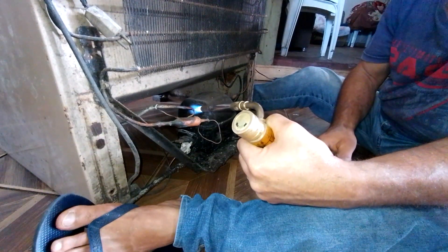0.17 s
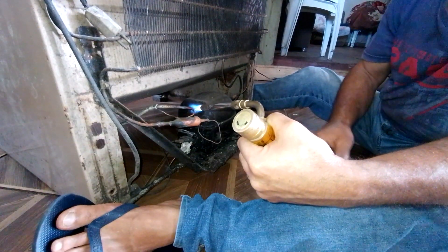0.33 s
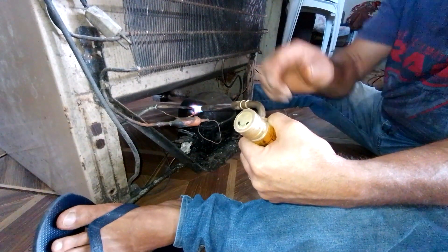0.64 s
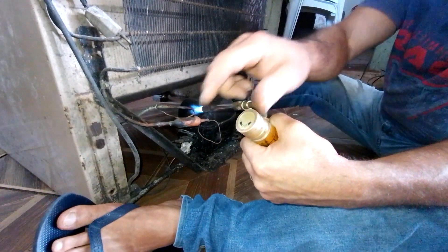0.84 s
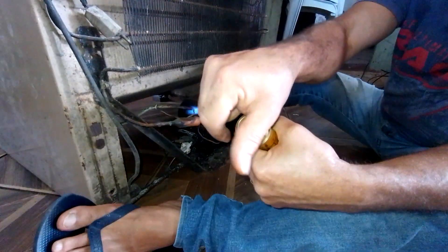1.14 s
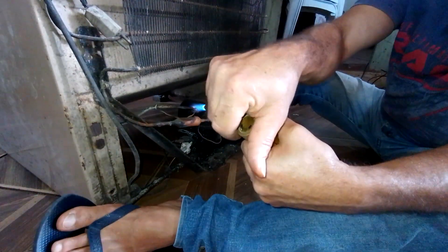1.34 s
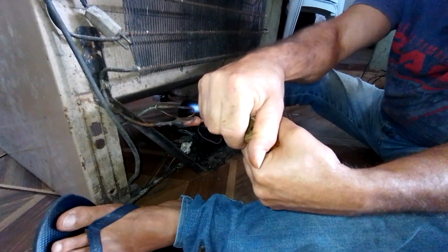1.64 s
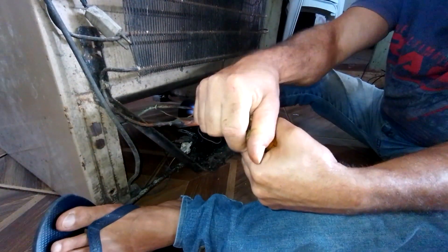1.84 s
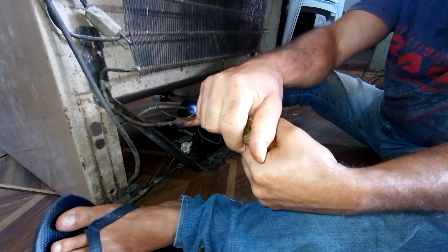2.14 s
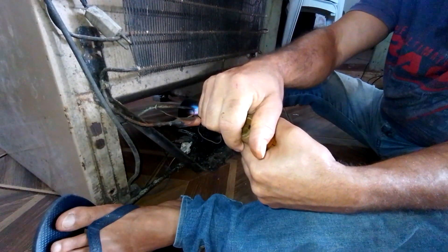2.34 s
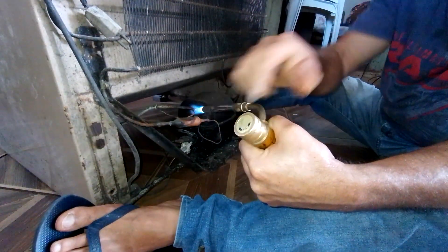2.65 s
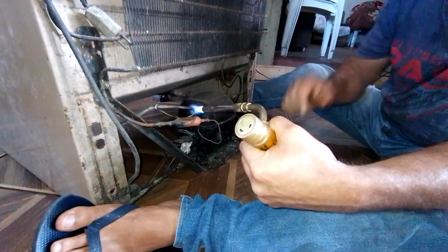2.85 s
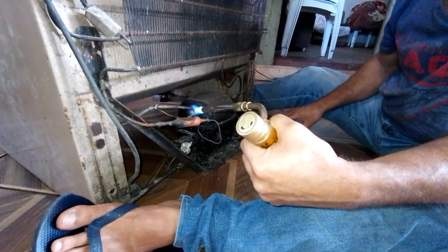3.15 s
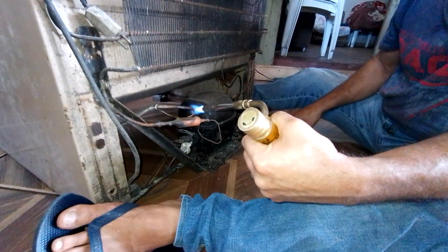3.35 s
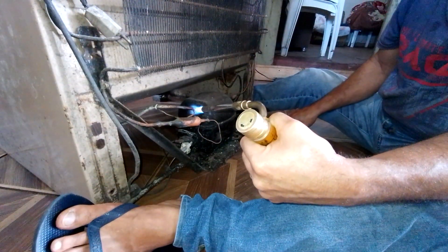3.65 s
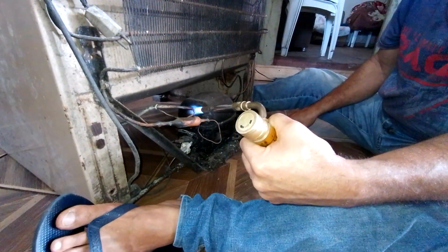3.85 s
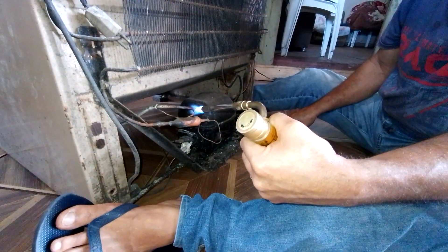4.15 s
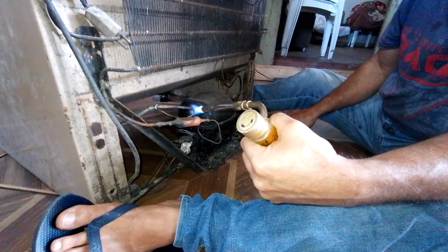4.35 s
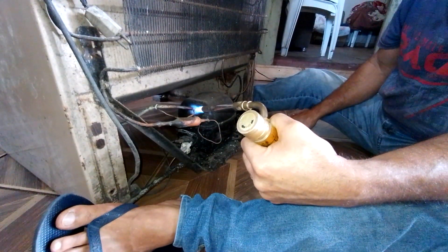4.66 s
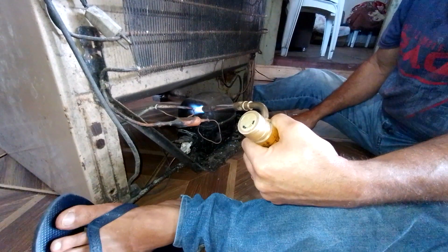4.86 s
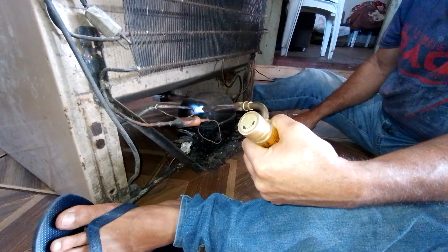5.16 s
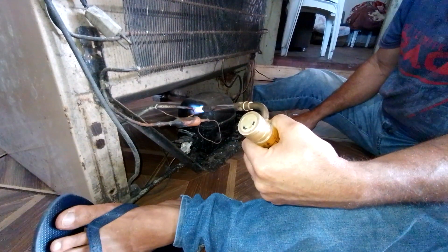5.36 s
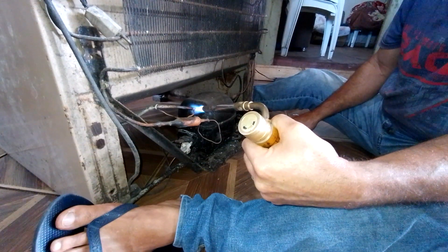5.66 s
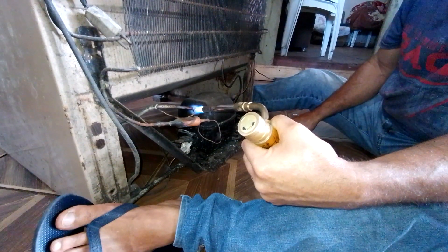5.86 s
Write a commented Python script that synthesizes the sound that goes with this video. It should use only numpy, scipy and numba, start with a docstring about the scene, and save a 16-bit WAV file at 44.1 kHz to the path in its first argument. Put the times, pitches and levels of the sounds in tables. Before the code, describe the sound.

Steady torch noise from start to end: hissing gas jet, rough airy roar, low drone and a thin unstable whistle inside a breathy tube note. Early on, a hand cups the torch and turns it up, bringing added piercing hiss for about a second before it settles into a fuller burn. Close single microphone, metallic colouring and short indoor echoes, with soft flame pops.

```python
"""The compressor bay of a refrigerator, where a hand-held gas torch heats a copper joint.
The gas jet hisses as filtered noise; the turbulent flame roars over a low drone and softly pops.
The burner tube sounds a wandering, breathy note (noise in a moving resonance) with a thin whistle (a tone).
A hand covers the torch for a while, and turning the valve up adds flow and extra hiss that settles.
The metal bay's resonances and short echoes colour it all, heard through one microphone."""
import sys
import numpy as np
from scipy import signal
from scipy.fft import rfft, irfft, next_fast_len
from scipy.io import wavfile
from scipy.ndimage import uniform_filter1d
from numba import njit

SR = 44100
rng = np.random.default_rng(int(sys.argv[2]) if len(sys.argv) > 2 else 0)


def waveform_to_disk(signal):
    """Save audio, clipped to [-1, 1], as 16-bit WAV at the path in sys.argv[1]."""
    frames = np.transpose(np.atleast_2d(signal))
    scaled = np.clip(frames, -1, 1) * 32767
    samples = np.round(scaled).astype(np.int16)
    wavfile.write(sys.argv[1], SR, samples)


N = 265041

# Noise spectra before the resonances, relative levels: (frequency [Hz], level [dB])
ROAR_SPECTRUM = [(40, -65), (200, -29.5), (400, -11), (540, -3), (660, 3), (950, 5.5), (1200, 2.5),
                 (1500, -2.5), (2000, -2.5), (3000, -8.5), (3900, -22), (4350, -46)]
DRONE_SPECTRUM = [(20, -32), (50, -40), (100, -22), (140, -18), (163, -20), (185, -16.5), (222, -13),
                  (270, -5.5), (305, -10), (370, -1.5), (430, -1.5), (560, -7), (1000, -35), (3000, -70)]
JET_SPECTRUM = [(20, -49), (800, -30), (2000, 0), (2600, 0), (3600, -0.5), (5500, 1.5), (7000, 1.5),
                (8300, 2.5), (9200, -2.5), (10560, -0.5), (10900, -19), (11500, -16.5), (11950, -33),
                (12700, -19.5), (13400, -26.5)]
VALVE_SPECTRUM = [(300, -55), (1000, -20), (2100, -15), (2650, 1), (3200, 1.5), (4400, 3), (5500, -11),
                  (8000, -15), (10800, -17), (11400, 2), (12400, -1), (13300, -30), (16000, -29)]

# Resonances and cancellations of the metal bay: (frequency [Hz], width [Hz], level [dB])
BAY_MODES = [(223, 15, 7.5), (250, 12, -12), (334, 6.7, 7.5), (362.3, 25.5, 11.5), (407.7, 8.5, 10.5),
             (437.4, 26, -21.2), (501.5, 40, 10.5), (546, 35, -11), (551, 223, -8), (584, 11, -7),
             (656, 75, 4.8), (742, 46, -3.5), (864, 22, 3.5), (915, 8, 4.5), (992, 9.2, 4.5),
             (1032, 12, 3.5), (1235, 19, -17.6), (1309, 71, -12), (1335, 9.2, 5.5), (1403, 196, 10),
             (1523, 5.8, 7.5), (1615, 25, -7), (1627, 15.3, 12.5), (1676, 7, 17.5), (1682, 158, -9.4),
             (1746, 8, 10.5), (1798, 28, 6.5), (1855, 8, 9), (2050, 59, -4.5), (2236, 27, -12),
             (2340, 110, 3), (2464, 24, 6), (2490, 23, -3), (2652, 16, 4), (2850, 125, -2),
             (3037, 6.9, 12.5), (3038, 270, -8), (3315, 140, 7.5), (3356, 36, -6.5), (3917, 354, -10),
             (3922, 19, 16), (4014, 18, 15), (4094, 9.4, 8.5), (4160, 7.3, 5), (4550, 53, -14),
             (4740, 16, -8.8), (4960, 293, -18.5), (5004, 100, 10.5), (5260, 140, -5.5), (5350, 95, 0.5),
             (6120, 150, -3.5), (6820, 350, -5), (7530, 210, 3.9), (7760, 75, -11), (9060, 560, -5.5),
             (9270, 225, -4.5), (9450, 284, 7.5)]
# The jet's hollow tone: (frequency [Hz], width [Hz], level [dB])
HOLLOW_MODES = [(2180, 77, 2), (2770, 130, -4.5), (2930, 100, 7.5), (4080, 140, 2.5), (4730, 690, -7),
                (6020, 220, -12), (6860, 150, -10), (8000, 300, -7), (9300, 130, 4.5), (10870, 700, -6)]
# Resonances and dips of the hand cupped over the torch: (frequency [Hz], width [Hz], level [dB])
HAND_MODES = [(2260, 64, 3), (2700, 64, -1), (2916, 59, 6), (4600, 300, -1.5), (5850, 230, -3),
              (6160, 140, 3.5), (6680, 200, -9), (6900, 130, 5.5), (7900, 730, -4.5), (9000, 260, 3),
              (9300, 300, 2.5), (11100, 200, -2)]
# Resonances of the valve hiss: (frequency [Hz], width [Hz], level [dB])
VALVE_RESONANCES = [(2340, 64, 19.5), (2420, 70, -12), (2680, 97, 13), (2800, 70, -3), (2960, 87, 15),
                    (3170, 80, 3)]

# Resting path of the burner tube's note: (time [s], frequency [Hz])
NOTE_PITCH = [(0.0, 1790), (0.11, 1860), (0.22, 1810), (0.36, 1760), (0.44, 1830), (0.53, 1790),
              (0.69, 1850), (0.86, 1805), (1.02, 1810), (1.2, 1865), (1.43, 1850), (1.55, 1790),
              (1.6, 1665), (1.7, 1630), (1.82, 1545), (1.97, 1690), (2.07, 1640), (2.27, 1660),
              (2.37, 1590), (2.46, 1675), (2.54, 1510), (2.68, 1840), (2.8, 1830), (2.92, 1690),
              (3.03, 1640), (3.3, 1640), (3.47, 1570), (3.62, 1730), (3.72, 1640), (3.85, 1680),
              (4.11, 1510), (4.3, 1650), (4.45, 1795), (4.62, 1795), (4.8, 1735), (4.98, 1630),
              (5.12, 1730), (5.26, 1690), (5.4, 1790), (5.57, 1530), (5.72, 1730), (5.92, 1800)]
# The jet's cancelled band shifts as the torch is moved: (time [s], frequency [Hz], depth [dB])
NULL_PATH = [(0, 4400, -34), (0.8, 4360, -36), (1.35, 4470, -18), (2.0, 4150, -24), (2.9, 4330, -27),
             (3.8, 4280, -52), (5.0, 4340, -35), (6.0, 4370, -22)]
# Soft pops of the flame: (time [s], level before decay [dB], decay time [s])
FLAME_POPS = [(0.509, -21, 0.0033), (0.979, -19, 0.003), (1.594, -18.5, 0.0069), (1.87, -18, 0.0044),
              (2.738, -17, 0.0018), (2.926, -24, 0.0029), (3.1, -34, 0.056), (3.266, -30, 0.004),
              (3.388, -17.5, 0.0024), (4.06, -25, 0.0037), (4.095, -23, 0.0038), (5.596, -25, 0.0029)]
# Swells and lulls of the drone: (time [s], level change [dB])
DRONE_PUFFS = [(0.67, -3), (1.05, -4), (1.3, -1), (1.66, 1.5), (3.22, 2), (3.42, 2.5), (3.61, -6),
               (3.93, 3.5), (5.07, 5.5), (5.2, 2), (5.6, 2), (5.8, 3)]
# Flame surges and lulls, strongest in note and whistle: (time [s], level change [dB], half length [s])
FLAME_SURGES = [(1.06, -8, 0.029), (1.21, 3, 0.06), (1.32, -3, 0.035), (1.41, 7.5, 0.019), (1.79, 1.5, 0.1),
                (2.075, -2.5, 0.066), (2.526, 2.5, 0.024), (3.136, 0, 0.037), (4.105, 2.5, 0.044),
                (4.497, 3, 0.08), (4.882, -2, 0.07), (5.577, 0.5, 0.04), (5.922, 2.5, 0.04)]

# Layer levels: (on the low flame [dB], gain as the valve opens [dB], change behind the hand [dB])
ROAR_LEVEL_DB = (-29, 2, -0.64)
DRONE_LEVEL_DB = (-37.5, 0.44, 0.5)
BURNER_LEVEL_DB = (-32, 3.5, -3.5)
WHISTLE_LEVEL_DB = (-38, 1.5, 1.5)
JET_LEVEL_DB = (-25.4, 1.27, -0.28)
# Valve hiss: (level [dB], hold [s], fade [dB/s])
VALVE_BODY = (-34.5, 0.98, 11)
VALVE_AIR = (-31, 0.72, 35)
# Share of the hollow tone in the jet: (on the low flame [0-1], with the valve open [0-1])
HOLLOW_SHARES = (0.93, 0.37)

# How hard the eddies shake each layer [dB per unit spread]
ROAR_FLUTTER_DB, JET_FLUTTER_DB, BURNER_FLUTTER_DB = 1.08, 0.73, 0.84
# The pitch at which there is no flare [Hz], and the gain for each octave of sag below it [dB]
REST_HZ = 1705
BURNER_FLARE_DB, ROAR_FLARE_DB, JET_FLARE_DB = 10, 4.5, 1
ROAR_SURGE_SHARE = 0.25   # part of the surges, in dB, that reaches the roar
PUFF_S = 0.037   # half length of a drone puff
OPEN_S, OPEN_RISE_S = 1.53, 0.074   # valve opening, and rise of the flow
HAND_ARRIVES_S, HAND_STAYS_S, HAND_MOVES_S = 1, 1.39, 0.03
# The drone grows once the arm is clear of the bay
DRONE_BUILD_DB, DRONE_BUILD_AT_S, DRONE_BUILD_S = 1.5, 2.66, 0.39
CUTOFF_HZ = 15300


def from_db(db):
    """Decibel law: 20 dB is a factor of ten in amplitude."""
    return 10 ** (np.asarray(db) / 20)


def rms_one(x):
    """Power normalisation: scale to unit rms."""
    return x / np.sqrt(np.mean(x ** 2) + 1e-20)


def steady(x, seconds=0.067):
    """Power averaging: turbulence holds its power over longer spans, leaving only the fast flicker."""
    power = uniform_filter1d(x ** 2, size=int(seconds * SR))
    return x / np.sqrt(power + 1e-20)


def in_time(rows):
    """Linear interpolation: each column of a curve at every sample."""
    times_s, *columns = np.transpose(rows)
    return [np.interp(np.arange(N) / SR, times_s, column) for column in columns]


def ramp(start_s, length_s):
    """Linear transition: rises from 0 to 1 and stays there."""
    return np.clip((np.arange(N) / SR - start_s) / length_s, 0, 1)


def drift(rate_hz):
    """Low-passed random process: unit rms, its spectrum falling above rate_hz."""
    hz = np.fft.rfftfreq(N, 1 / SR)
    spectrum = rfft(rng.standard_normal(N)) / (1 + (hz / rate_hz) ** 2)
    return rms_one(irfft(spectrum, N))


def turbulence(colour):
    """Spectral shaping: steady random noise weighted by the given spectrum."""
    size = next_fast_len(N)
    hz, db = np.transpose(colour)
    bins_hz = np.maximum(np.fft.rfftfreq(size, 1 / SR), 1)
    gain = from_db(np.interp(np.log(bins_hz), np.log(hz), db))
    return irfft(rfft(rng.standard_normal(size)) * gain, size)[:N]


def resonate(x, modes):
    """Modal filtering: a chain of ringing peaks and cancelling dips."""
    for hz, width_hz, db in modes:
        pole = np.pi * width_hz / SR
        zero = pole * from_db(db)
        cosine = np.cos(2 * np.pi * hz / SR)
        x = signal.lfilter([1 + zero, -2 * cosine, 1 - zero], [1 + pole, -2 * cosine, 1 - pole], x)
    return x


@njit
def moving_resonance(x, angle, radius):
    """Damped oscillator: a two-pole resonance of moving centre (radians a sample) and sharpness."""
    y = np.zeros(len(x))
    for i in range(2, len(x)):
        drive = x[i] - x[i - 2]
        y[i] = drive + 2 * radius[i] * np.cos(angle[i]) * y[i - 1] - radius[i] ** 2 * y[i - 2]
    return y


def reflections(x, wet_db, fade_s, count=40):
    """Interference: short echoes from floor, panels and walls comb the noise finely."""
    delays_s = rng.uniform(.007, .05, count)
    gains = rng.choice([-1, 1], count) * np.exp(-delays_s / fade_s)
    gains *= from_db(wet_db) / np.sqrt(np.sum(gains ** 2))
    echoes = sum(gain * np.roll(x, int(delay_s * SR)) for delay_s, gain in zip(delays_s, gains))
    return (x + echoes) / np.sqrt(1 + from_db(wet_db) ** 2)


def layer_db(levels):
    """Source strength: a layer's level follows the gas flow and is altered by the hand."""
    low_db, opened_db, covered_db = levels
    return low_db + opened_db * opening() + covered_db * hand_cover()


def flare():
    """Flame and tube coupling: flaring as octaves of sag in the note, negative as the note rises."""
    return np.log2(REST_HZ / in_time(NOTE_PITCH)[0])


def flame_roar(eddies, low_cut_hz=260):
    """Combustion noise: turbulent burning radiates a broad roar that swells with the eddies."""
    level_db = layer_db(ROAR_LEVEL_DB) + ROAR_FLARE_DB * flare()
    level_db = level_db + ROAR_FLUTTER_DB * eddies + ROAR_SURGE_SHARE * surges()
    strength = from_db(level_db) + flame_pops()
    roar = steady(resonate(turbulence(ROAR_SPECTRUM), BAY_MODES)) * strength
    # so small a flame radiates little bass, even when it pops
    return signal.sosfilt(signal.butter(3, low_cut_hz, "high", fs=SR, output="sos"), roar)


def flame_drone():
    """Modal excitation: low combustion noise sounds the bay's lowest modes."""
    drone = steady(resonate(turbulence(DRONE_SPECTRUM), BAY_MODES), seconds=0.19)
    build_db = DRONE_BUILD_DB * ramp(DRONE_BUILD_AT_S, DRONE_BUILD_S)
    return drone * from_db(layer_db(DRONE_LEVEL_DB) + build_db + drone_puffs())


def burner_note(eddies, low_width_hz=280, high_width_hz=190, waver_hz=20):
    """Tube resonance driven by the flame: loud and broad as it sags, sharper as it rises."""
    centre_hz, = in_time(NOTE_PITCH)
    angle = 2 * np.pi * (centre_hz + waver_hz * drift(rate_hz=9)) / SR
    width_hz = np.interp(centre_hz, [1620, 1830], [low_width_hz, high_width_hz])
    radius = np.exp(-np.pi * width_hz / SR)
    drive = rng.standard_normal(N) * width_hz * np.sqrt(width_hz)   # evens the power across widths
    once = moving_resonance(drive, angle, radius)
    note = resonate(moving_resonance(once, angle, radius), BAY_MODES)
    level_db = layer_db(BURNER_LEVEL_DB) + BURNER_FLARE_DB * flare()
    return steady(note, seconds=0.057) * from_db(level_db + BURNER_FLUTTER_DB * eddies + surges())


def burner_whistle(waver_hz=22, jitter_hz=46, flicker_db=2.5):
    """Self-oscillation: at the note's core the tube sings one thin, wavering, flickering tone."""
    hz = in_time(NOTE_PITCH)[0] + waver_hz * drift(rate_hz=30) + jitter_hz * drift(rate_hz=150.2)
    tone = resonate(np.sin(2 * np.pi * np.cumsum(hz) / SR), BAY_MODES)
    level_db = layer_db(WHISTLE_LEVEL_DB) + flicker_db * drift(rate_hz=60) + surges()
    return steady(tone, seconds=0.1) * from_db(level_db)


def gas_jet(eddies):
    """Jet noise: gas leaving the nozzle hisses, hollow at first and fuller once the valve opens."""
    low, opened = HOLLOW_SHARES
    share = low + (opened - low) * opening()
    hiss = rms_one(shifting_null(resonate(turbulence(JET_SPECTRUM), BAY_MODES)))
    hiss = (1 - share) * hiss + share * resonate(hiss, HOLLOW_MODES)
    level_db = layer_db(JET_LEVEL_DB) + JET_FLARE_DB * flare() + JET_FLUTTER_DB * eddies
    return hiss * from_db(level_db)


def shifting_null(x, width_hz=370, wander_hz=18):
    """Destructive interference: one band cancels at the microphone and trembles with the holding hand."""
    centre_hz, depth_db = in_time(NULL_PATH)
    angle = 2 * np.pi * (centre_hz + wander_hz * drift(rate_hz=4)) / SR
    radius = np.full(N, np.exp(-np.pi * width_hz / SR))
    removed = 1 - from_db(depth_db / 2)
    for _ in range(2):   # each notch gives half the depth in dB
        band = (1 - radius ** 2) / 2 * moving_resonance(x, angle, radius)
        x = x - removed * band
    return x


def flame_pops(rise_s=0.00079):
    """Sudden heat release: pockets of gas catch all at once; their joint envelope."""
    t = np.arange(N) / SR
    return sum(from_db(db) * ramp(s, rise_s) * np.exp(-abs(t - s) / fade_s) for s, db, fade_s in FLAME_POPS)


def drone_puffs():
    """Amplitude modulation: short, round swells and lulls of the drone, in dB."""
    t = np.arange(N) / SR
    return sum(db * np.exp(-((t - s) / PUFF_S) ** 2) for s, db in DRONE_PUFFS)


def hand_cover():
    """Obstruction: 1 while the hand is over the torch, 0 while it is away."""
    arriving = ramp(HAND_ARRIVES_S, HAND_MOVES_S)
    leaving = ramp(HAND_ARRIVES_S + HAND_STAYS_S, HAND_MOVES_S)
    return arriving - leaving


def cupped_hand(x):
    """Cavity resonance: while the hand covers the torch, the jet is heard through its hollow."""
    cover = hand_cover()
    return (1 - cover) * x + cover * resonate(x, HAND_MODES)


def surges():
    """Unsteady combustion: round swells and lulls of the flame, in dB."""
    t = np.arange(N) / SR
    return sum(db * np.exp(-((t - s) / half_s) ** 2) for s, db, half_s in FLAME_SURGES)


def opening():
    """Flow control by the valve: 0 on the low flame, 1 once turned up."""
    return ramp(OPEN_S, OPEN_RISE_S)


def settling(shape, rise_s=0.1):
    """Exponential decay: the hiss swells as the valve opens, holds and fades."""
    level_db, hold_s, fade_db_per_s = shape
    fading_s = np.maximum(np.arange(N) / SR - OPEN_S - hold_s, 0)
    return ramp(OPEN_S, rise_s) * from_db(level_db - fade_db_per_s * fading_s)


def valve_hiss(sputter_db=1.5, split_hz=3600):
    """Flow noise at the valve: uneven hiss whose airy top fades before its resonant body."""
    hiss = rms_one(resonate(turbulence(VALVE_SPECTRUM), BAY_MODES + VALVE_RESONANCES))
    body = signal.sosfilt(signal.butter(5, split_hz, "low", fs=SR, output="sos"), hiss)
    air = signal.sosfilt(signal.butter(5, split_hz, "high", fs=SR, output="sos"), hiss)
    sputter = from_db(sputter_db * drift(rate_hz=23))
    return (body * settling(VALVE_BODY) + air * settling(VALVE_AIR)) * sputter


def scene():
    """Superposition: sources add, the same eddies shake roar, note and jet; both channels are alike."""
    eddies = drift(rate_hz=71)
    flame = flame_roar(eddies) + flame_drone()
    burner = burner_note(eddies) + burner_whistle()
    gas = cupped_hand(gas_jet(eddies)) + valve_hiss()
    heard = reflections(flame + burner + gas, wet_db=-11, fade_s=0.026)
    return np.array([heard, heard])


def record(dry):
    """Band limiting: a steep elliptic low-pass cuts the top."""
    return signal.sosfilt(signal.ellip(10, .1, 80, CUTOFF_HZ, fs=SR, output="sos"), dry)


dry = scene()
out = record(dry)
waveform_to_disk(out)
```